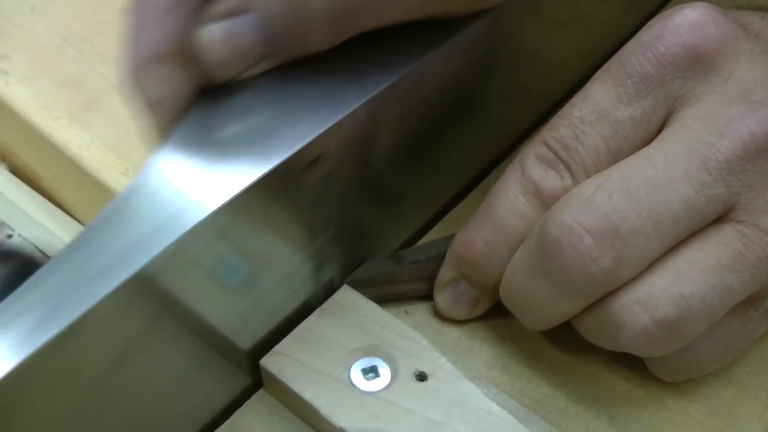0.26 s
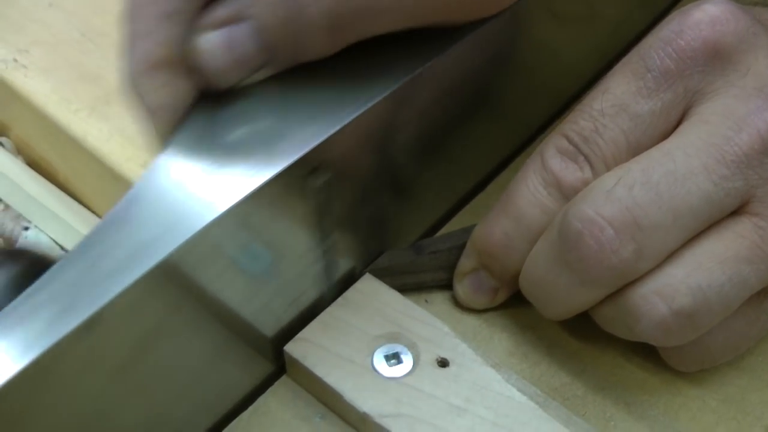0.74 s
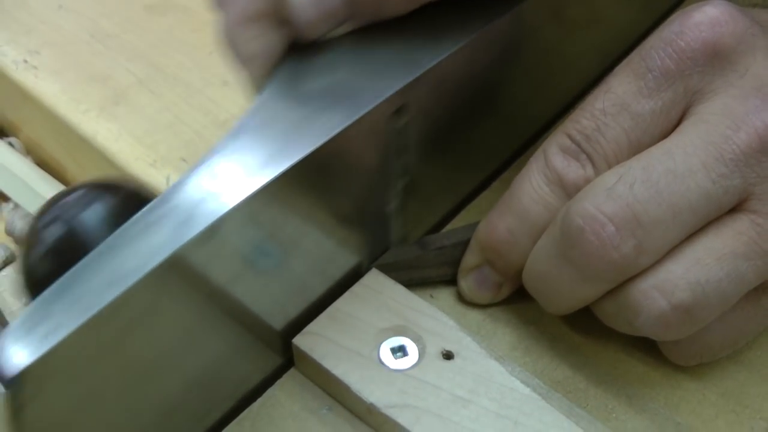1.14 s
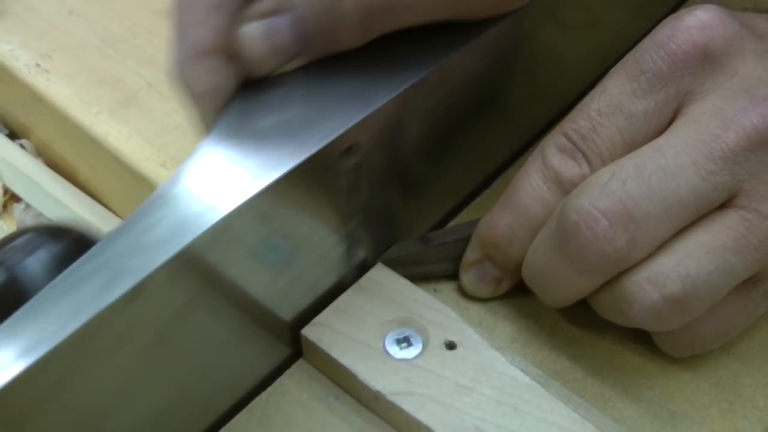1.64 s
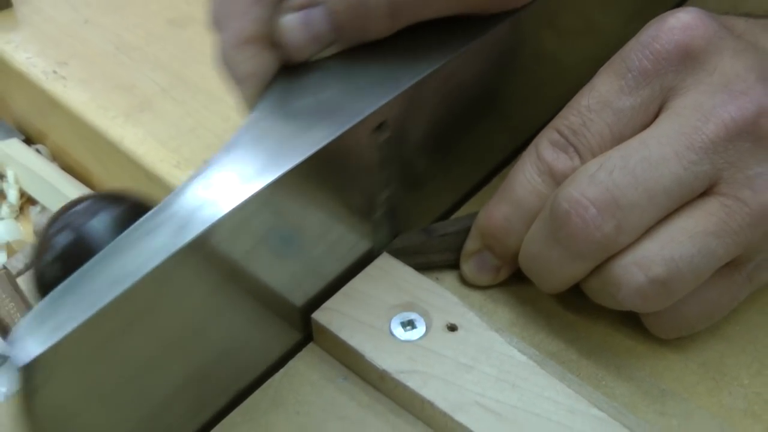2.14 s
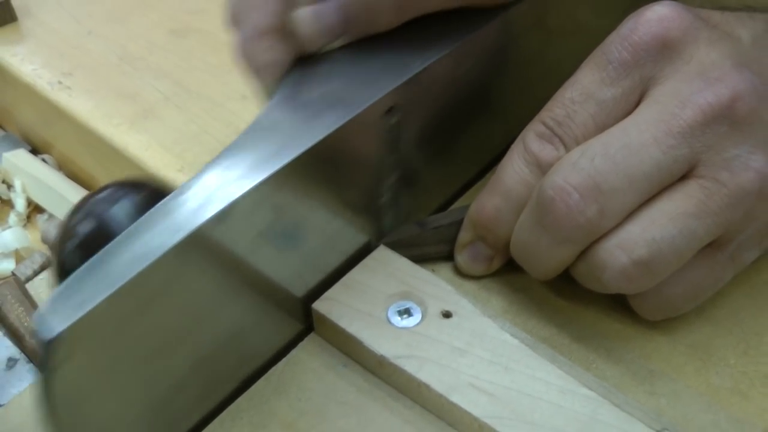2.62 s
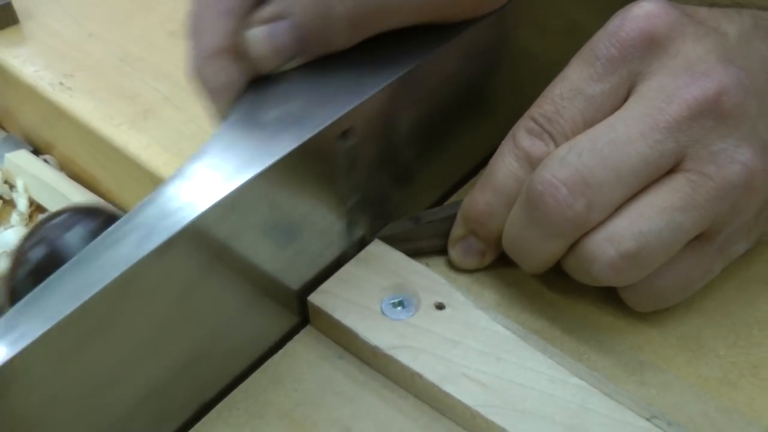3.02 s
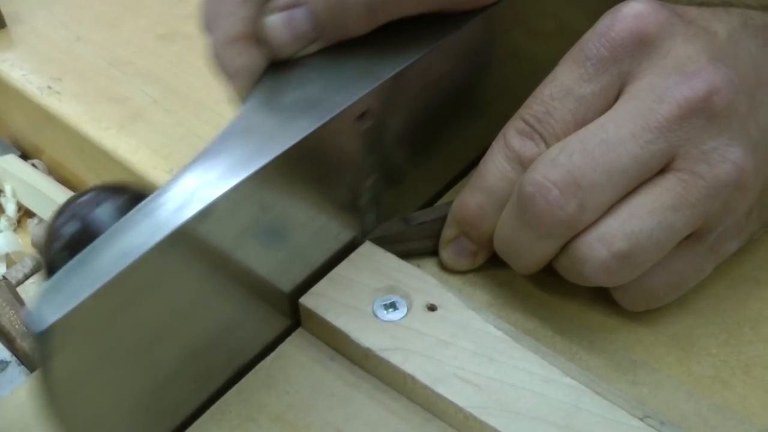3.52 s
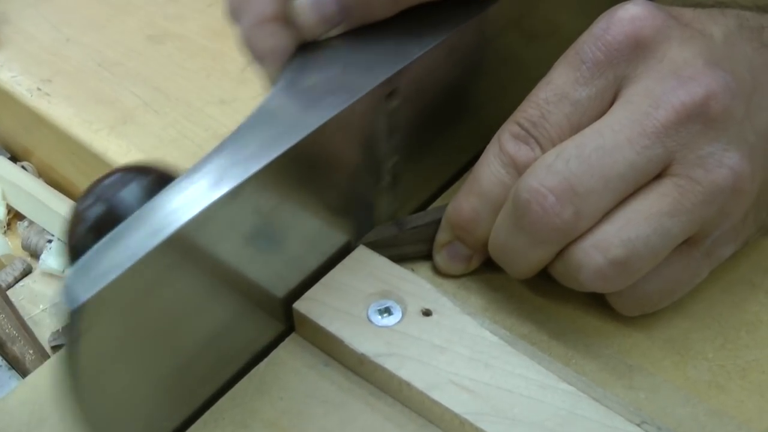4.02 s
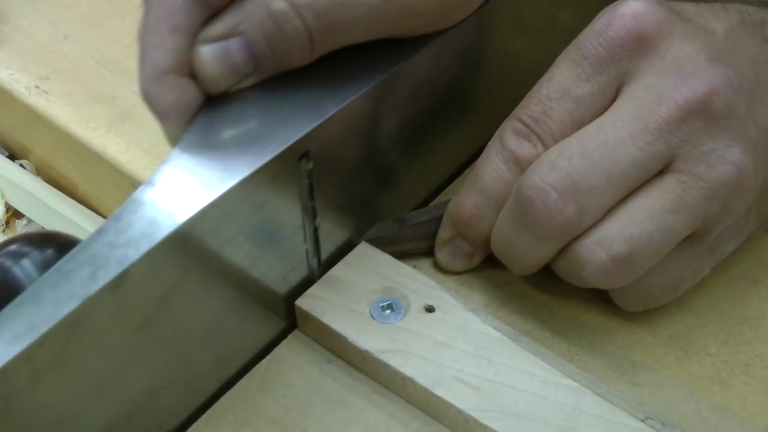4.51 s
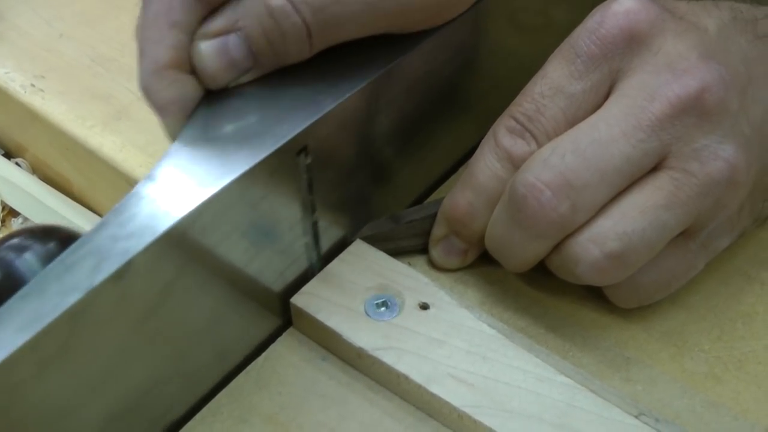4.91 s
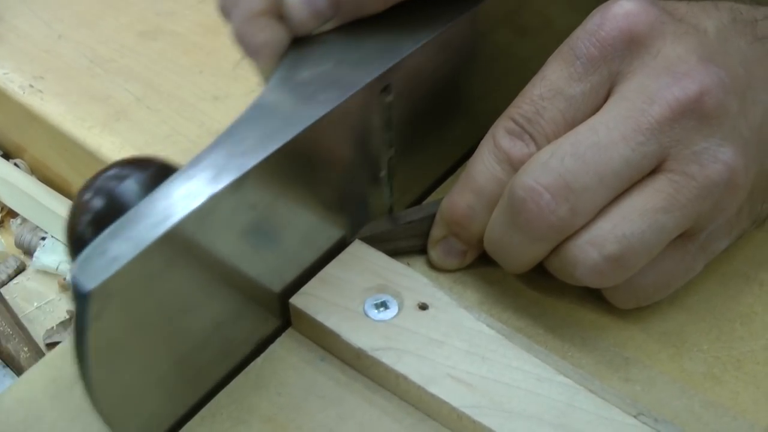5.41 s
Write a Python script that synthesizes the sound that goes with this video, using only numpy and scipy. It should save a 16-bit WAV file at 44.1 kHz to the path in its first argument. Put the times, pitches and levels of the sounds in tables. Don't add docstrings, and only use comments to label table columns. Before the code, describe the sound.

A metal hand plane shuttles rapidly over wood, each push a crisp tearing rasp, each return a softer scrape, with small knocks at every turn.

```python
import sys
import numpy as np
from scipy import signal
from scipy.fft import rfft, irfft
from scipy.io import wavfile
from scipy.ndimage import uniform_filter1d

SR = 44100
rng = np.random.default_rng(int(sys.argv[2]) if len(sys.argv) > 2 else 0)


def voltage_ratio(decibels):
    exponent = np.asarray(decibels, float) / 20
    return 10 ** exponent


def unload_audio(sound):
    columns = np.transpose(np.atleast_2d(sound))
    steps = np.round(np.clip(columns, -1, 1) * 32767)
    wavfile.write(sys.argv[1], SR, steps.astype(np.int16))


N = 249385
T = np.arange(N) / SR
TAPS = 4096


def through(x, response):
    return signal.fftconvolve(x, response)[:N]


def causal(log_gain):
    cepstrum = irfft(log_gain)
    cepstrum[1:TAPS // 2] *= 2
    cepstrum[TAPS // 2 + 1:] = 0
    response = irfft(np.exp(rfft(cepstrum)))
    return response / np.sqrt(np.sum(response ** 2))


def log_colour(points):
    hz, db = np.transpose(points)
    grid = np.linspace(1, SR / 2, TAPS // 2 + 1)
    return np.log(voltage_ratio(np.interp(np.log(grid), np.log(hz), db)))


def body(peaks, source, group=slice(None)):
    grid = np.linspace(1, SR / 2, TAPS // 2 + 1)
    colour = np.exp(2 * log_colour(source))
    power = np.array([voltage_ratio(2 * db) / (1 + ((grid - hz ** 2 / grid) / width) ** 2) ** 2
                      for hz, width, db in peaks])
    part = (power[group].sum(0) + 1e-10) * colour
    share = part.sum() / np.sum(power * colour)
    return causal(np.log(part) / 2) * np.sqrt(share)


def ring(modes):
    t = T[:SR // 3]
    y = sum(gain * np.sin(2 * np.pi * hz * t) * 1000. ** (-t / t60) for hz, gain, t60 in modes)
    return y / np.sqrt(np.mean(y[:SR * 12 // 1000] ** 2))


def blows(times, db):
    x = np.zeros(N)
    place = (np.asarray(times) * SR).astype(int)
    x[np.minimum(place, N - 1)] = voltage_ratio(np.asarray(db))
    return x


def wander(rate_hz):
    hold = int(SR / np.clip(rate_hz, 1, 700))
    levels = rng.standard_normal(N // 60)
    return uniform_filter1d(np.repeat(levels, hold)[:N], hold)


def fibres(spread_db, flicker_db, flicker_hz):
    level_db = spread_db * rng.exponential(size=N) + flicker_db * wander(flicker_hz)
    x = rng.standard_normal(N) * voltage_ratio(level_db)
    return x / np.sqrt(np.mean(x ** 2))


def sound(force, peaks, source, patchy_db, patchy_hz):
    total = np.zeros(N)
    for k in range(3):
        own = rng.choice([-1., 1.], N) * voltage_ratio(patchy_db * wander(patchy_hz))
        total += through(force * own, body(peaks, source, slice(k, None, 3)))
    return total


def chatter(force, hz, ring_s):
    drift_hz, flicker_db = 55, 3
    phase = 2 * np.pi * np.cumsum(hz + drift_hz * wander(120)) / SR
    tail = np.exp(-T[:TAPS] / ring_s)
    strength = through(force * voltage_ratio(flicker_db * wander(160)), tail / tail.sum())
    return strength * np.sin(phase) * np.sqrt(2)


# frequency_hz, width_hz, level_db
BOARD_PEAKS = [(281, 88, -16), (388, 96, -6.5), (435, 66.5, -2.5), (565, 67, 2.5), (616.3, 43, -6),
               (721.5, 66, -10), (820, 75, -12.5)]
IRON_PEAKS = [(1085, 116, -12.5), (1233, 31.4, -6.5), (1408, 91, -4.5), (1733, 650, -6.5), (2020, 156, -11),
              (2085, 440, -17.5)]
EDGE_PEAKS = [(5085, 1000, -10), (5800, 430, -10), (6260, 100, -10), (6660, 310, -7.5), (7265, 500, -5),
              (8000, 400, -7.5), (9330, 170, -2), (9723, 1170, 6), (10890, 133, -36)]
TIP_PEAKS = [(11100, 3800, 1), (11600, 610, -21.5), (12940, 12300, -10), (15800, 470, -22),
             (14800, 590, -34)]
SIDE_PEAKS = [(2670, 1020, -2), (2811, 128, 1.5), (3175, 127, -1.5), (3386, 210, 0), (3865, 370, -6),
              (4717, 110, -5)]
# frequency_hz, build_up_s, ring_s
CHATTER_NOTES = [(1421, 0.016, 0.0017), (2088, 0.0067, 0.0015), (2750, 0.005, 0.0016),
                 (559.3, 0.0013, 0.0058)]
SLOW_BITE = 1.2


def contact(strokes, hums_db, notes, laws, usual_db, tip_curve, lean_curve, times_s, source, grain):
    edge, tip, iron, side, board = np.zeros((5, N))
    sung = np.zeros((len(CHATTER_NOTES), N))
    note_build_s = np.array(CHATTER_NOTES)[:, 1:2]
    quick_s, load_s, off_s = times_s
    for (start, length, early_db, late_db, load_db), hum_db, notes_db in zip(strokes, hums_db, notes):
        since = T - start
        on = (since > 0) * np.clip((length - since) / off_s + .5, 0, 1)
        fresh = np.clip(since, 0, None) + (start < .004)

        def across(early, late):
            return on * voltage_ratio(np.interp(since / length, [.25, .75], [early, late]))

        bite_s = quick_s * voltage_ratio(SLOW_BITE * max(late_db - early_db, 0))
        bite = (1 - np.exp(-fresh / bite_s)) * across(early_db, late_db)
        load = 1 - np.exp(-fresh / (load_s + bite_s))
        edge += bite
        tip += bite * voltage_ratio(np.interp(start, *np.transpose(tip_curve)))
        leans_db = 0, np.interp(start, *np.transpose(lean_curve))
        for part, (early, late, share), lean_db in zip((iron, side), laws, leans_db):
            followed_db = usual_db + share * (load_db - usual_db)
            part += load * across(early + lean_db, late) * voltage_ratio(followed_db)
        board += load * on * voltage_ratio(hum_db - 6.5)
        sung += voltage_ratio(notes_db)[:, None] * on * (1 - np.exp(-fresh / note_build_s))
    total = sum(chatter(force, hz, ring_s) for force, (hz, _, ring_s) in zip(sung, CHATTER_NOTES))
    free_board = BOARD_PEAKS[:3] + BOARD_PEAKS[4:]
    parts = ((edge, EDGE_PEAKS), (tip, TIP_PEAKS), (iron, IRON_PEAKS), (side, SIDE_PEAKS), (board, free_board))
    for force, peaks in parts:
        total += sound(grain * force, peaks, source, patchy_db=0.5, patchy_hz=86.3)
    return total


# start_s, length_s, early_tearing_db, late_tearing_db, iron_load_db
CUTS = [(0, 0.0022, -21, -18, -25.5), (0.3185, 0.02, -22.5, -19.5, -32), (0.651, 0.0244, -21, -21.5, -30),
        (0.9918, 0.026, -20.5, -19, -33), (1.3328, 0.03, -17, -19.5, -30),
        (1.6649, 0.031, -18, -20.5, -32.5), (2.0088, 0.04, -22, -24.5, -30.5),
        (2.3527, 0.049, -24, -25.5, -27.5), (2.7138, 0.037, -21.5, -24.5, -28.5),
        (3.0687, 0.0322, -15.5, -23.5, -28), (3.4149, 0.034, -17.5, -23.5, -25.5),
        (3.7671, 0.036, -18.5, -24.5, -26), (4.1404, 0.025, -14.5, -22, -25.5),
        (4.493, 0.03, -16.5, -22.5, -24), (4.839, 0.038, -18, -26, -24.5), (5.2072, 0.032, -16.5, -22, -29),
        (5.5767, 0.035, -17.5, -22.5, -30)]
# time_s, strength_db, board_hum_db (during the cut before)
EXITS = [(0.008, -22.5, -9.5), (0.3404, -53, -20.5), (0.676, -51, -25.5), (1.0183, -42, -28.5),
         (1.3616, -36, -23.5), (1.6957, -36, -26), (2.0526, -30, -26), (2.405, -20.5, -25),
         (2.753, -28, -24), (3.0994, -15.5, -18.5), (3.4495, -20, -19.5), (3.8045, -23.5, -23),
         (4.1699, -40, -21.5), (4.526, -33, -23), (4.877, -37, -23.5), (5.242, -55, -24.5),
         (5.613, -55, -25)]
# time_s, level_db
SNAPS = [(0.3262, -12), (0.3288, -9.4), (0.66, -11.5), (1.0045, -12.5), (1.3373, -9.3), (1.3459, -13.0),
         (1.6675, -14), (3.0724, -13.0), (3.0842, -11.0), (3.7745, -12.2), (4.1463, -9.1), (4.497, -7.5),
         (4.5048, -13.0), (4.5091, -10.4), (4.84, -12.8), (4.844, -12.1), (4.8483, -12.1), (5.2129, -10.5),
         (5.5805, -12.2), (5.5893, -12.3)]
# start_s, low_note_db, middle_note_db, side_wall_note_db, board_note_db
CUT_NOTES = [(0, -45, -55, -47, -36), (0.32, -37, -54, -31, -27), (0.65, -50, -42, -34, -30.5),
             (0.99, -45, -40, -30, -27), (1.33, -37, -48, -32.5, -26.5), (1.66, -36, -38, -37, -26.5),
             (2.01, -35, -34, -31, -28.5), (2.35, -35, -45, -32.5, -33.5), (2.71, -29.5, -34, -30, -33.5),
             (3.07, -30, -36, -43, -25.5), (3.41, -27.5, -35, -39, -33.5), (3.77, -38, -39, -37, -29),
             (4.14, -62, -31.5, -33, -24), (4.49, -43, -30, -33, -26), (4.84, -56, -28.5, -47, -30),
             (5.21, -33, -25.5, -37, -27), (5.58, -33, -32.5, -39, -24.5)]
# early_over_load_db, late_over_load_db, share_of_load_changes (0-1)
CUT_LOAD = [(-1, 0.62, 0.9), (-2, -0.25, 0.023)]
CUT_USUAL_DB = -29.5
# time_s, tip_over_edge_db
CUT_TIP = [(0.2, -12), (1.3, -26), (2.6, 1), (3.1, -7), (4.0, 2), (5.6, -3)]
# time_s, lean_db
CUT_LEAN = [(0.3, 3.5), (1.4, 4.5), (2.0, 6.5), (2.7, 4.5), (3.2, 6.5), (4.1, 5.5), (4.5, 3.5), (5.6, 2.5)]
# edge_bites_s, load_builds_s, contact_ends_s
CUT_TIMES_S = (0.0009, 0.0025, 0.003)
# frequency_hz, level_db
TEAR_COLOUR = [(200, -3.5), (400, -2), (570, 4), (1000, -5.5), (2200, 2), (4000, 0), (6500, 9), (9000, 2),
               (16000, 25.5)]
RUB_COLOUR = [(200, 10), (500, -4.5), (1500, -1), (4000, 8), (7500, -7.5), (10000, -3.5), (16000, -6)]
# frequency_hz, level_db
SHADE = [(20, 0), (11000, 0), (12200, 2.5), (12700, 1.5), (13000, -6), (13980, -7), (14120, -1),
         (20000, -2)]
# frequency_hz, signed_gain, t60_s
LET_GO = [(322, 0.09, 0.3), (399, 0.42, 0.118), (435, -0.46, 0.165), (486, 0.86, 0.04), (550, -1.0, 0.12),
          (590, 0.58, 0.115), (711, 0.12, 0.114)]
FRONT_KNOCK = [(266, -0.1, 0.272), (290, 0.08, 0.3), (326, 0.32, 0.119), (404, -1.0, 0.041),
               (423, 0.56, 0.052), (531, -0.03, 0.266), (584, 0.13, 0.081), (557, 0.06, 0.057),
               (735, -0.03, 0.24), (1320, 0.07, 0.027), (1399, -0.05, 0.063), (2054, -0.03, 0.067)]
# frequency_hz, width_hz, level_db
TICK_PEAKS = [(702, 116, 6), (1169, 166, 2), (1366, 130, 5.5), (2080, 250, -10)]
THUD_PEAKS = [(216, 210, 2.3), (330, 155, 24)]


def cut():
    exit_s, exit_db, hum_db = np.transpose(EXITS)
    tearing = contact(CUTS, hum_db, np.array(CUT_NOTES)[:, 1:], CUT_LOAD, CUT_USUAL_DB, CUT_TIP, CUT_LEAN,
                      CUT_TIMES_S, TEAR_COLOUR, fibres(1.6, 2.4, 400))
    tearing = through(tearing, causal(log_colour(SHADE))) * voltage_ratio(-1.07)

    snap_s, snap_db = np.transpose(SNAPS)
    chips = through(blows(snap_s - .0014, snap_db - 3), np.hanning(90)) * rng.choice([-1., 1.], N)
    chips = through(chips, body(EDGE_PEAKS[5:] + TIP_PEAKS[:2], RUB_COLOUR))

    thump_db, click_db = exit_db - 18, exit_db - 7
    spring = through(blows(exit_s + 0.00329, exit_db - 5.5), ring(LET_GO))
    spring += through(blows(exit_s, thump_db), ring(FRONT_KNOCK))
    click = through(blows(exit_s, click_db + 19), body(TICK_PEAKS[1:3], RUB_COLOUR))
    thud = through(blows(exit_s, thump_db + 24.0), body(THUD_PEAKS, RUB_COLOUR))
    return tearing + chips + spring + click + thud


# time_s, knock_db, slide_before_stick_db, slide_after_stick_db
FRONT_TURNS = [(0.0719, -37.5, -43.5, -40), (0.4129, -34, -41, -39.5), (0.7553, -35.5, -42, -41),
               (1.0901, -35, -44.5, -40.5), (1.4344, -36, -43, -41.5), (1.7737, -37.5, -44.5, -43.5),
               (2.1229, -38.5, -46, -44), (2.4666, -38, -48, -41.5), (2.8203, -38, -45, -41.5),
               (3.1694, -36, -46, -41.5), (3.5188, -37.5, -44, -42.5), (3.8802, -38.5, -46, -41.5),
               (4.2418, -36.5, -43.5, -39.5), (4.598, -37, -45.5, -43), (4.9545, -38, -46, -46),
               (5.3221, -38, -46, -45.5)]
REAR_TURNS = [(0.2415, -34.5, -41.5, -39.5), (0.5848, -34.5, -40, -37), (0.9268, -34, -39, -36),
              (1.264, -34.5, -42, -37), (1.6006, -34.5, -41, -37.5), (1.948, -34.5, -44, -41.5),
              (2.2939, -36, -44, -45.5), (2.6475, -36.5, -43.5, -42.5), (2.999, -36.5, -40.5, -43.5),
              (3.346, -34.5, -39.5, -40), (3.697, -36, -41, -42.5), (4.0692, -34.5, -38.5, -40.5),
              (4.422, -33.5, -40.5, -40.5), (4.7757, -34.5, -39.5, -42.5), (5.143, -35, -41.5, -42),
              (5.512, -35, -43, -42)]


def turns():
    return np.stack([FRONT_TURNS, REAR_TURNS], axis=1).reshape(-1, 4)


# push_db, pull_db
SEAT_IRON_DB = (-7.5, -5.5)
SEAT_SIDE_DB = (-14, -9.5)
SEAT_TIP_DB = (-6.5, -2.5)


def slide():
    s, _, before_db, after_db = np.transpose(np.vstack([REAR_TURNS[0], turns()]))
    count = len(s)
    stops = np.r_[s[1] - .17, s[1:], s[-1] + .18] + 0.009
    place = np.interp(T, stops, np.arange(len(stops)))
    speed = np.abs(np.sin(np.pi * place))
    marks = np.arange(count)[:, None] + [.3, .7]
    level_db = np.interp(place, marks.ravel(), np.c_[before_db, after_db].ravel())
    grain = fibres(1.9, 1.4, 200) * voltage_ratio(level_db)

    def seat(pair_db):
        return voltage_ratio(np.interp(place, np.arange(count) + .5, np.resize(pair_db, count)))

    def rub(force, peaks, damp=1.7):
        damped = np.array(peaks) * [1, damp, 1]
        return sound(grain * force, damped, RUB_COLOUR, patchy_db=4.0, patchy_hz=13)

    edge = rub(speed ** 1.51, EDGE_PEAKS) * voltage_ratio(-3.5)
    tip = rub(speed ** 1.7 * seat(SEAT_TIP_DB), TIP_PEAKS)
    iron = rub(speed ** 1.64 * seat(SEAT_IRON_DB), IRON_PEAKS)
    side = rub(speed ** 0.81 * seat(SEAT_SIDE_DB), SIDE_PEAKS)
    board = rub(speed ** 0.67, BOARD_PEAKS, damp=1.19) * voltage_ratio(-4.5)
    return edge + tip + iron + side + board


# frequency_hz, signed_gain, t60_s
REAR_KNOCK = [(278, 0.13, 0.102), (314, 0.21, 0.109), (336, -0.9, 0.027), (417, 1.0, 0.025),
              (431, -0.34, 0.066), (539, 0.1, 0.077), (581, -0.17, 0.07), (615, -0.06, 0.133),
              (694, 0.05, 0.113), (1245, 0.03, 0.05), (1340, 0.01, 0.099), (2248, -0.01, 0.025)]
# time_s, level_db
CRUMBS = [(0.2555, -47), (0.6025, -46), (0.9425, -42), (1.282, -44), (1.6175, -47), (4.4348, -47)]


def knocks():
    s, db = turns().T[:2]
    tick = through(blows(s + 0.00116, db + 10.5), body(TICK_PEAKS, RUB_COLOUR))
    crumbs = through(blows(*np.transpose(CRUMBS)), body(EDGE_PEAKS[3:6] + TIP_PEAKS, RUB_COLOUR)) * voltage_ratio(8.0)
    odd = through(blows(s + .002, db - 13) * rng.standard_normal(N), ring(LET_GO))
    front = through(blows(s[::2], db[::2]), ring(FRONT_KNOCK))
    rear = through(blows(s[1::2], db[1::2]), ring(REAR_KNOCK))
    return tick + crumbs + odd + front + rear


# start_s, length_s, early_scrape_db, late_scrape_db, iron_load_db
DRAGS = [(0.158, 0.024, -40, -35.5, -37), (0.5143, 0.028, -37.5, -42, -38.5),
         (0.854, 0.031, -32.5, -42, -38.5), (1.187, 0.027, -32, -34.5, -35),
         (1.527, 0.028, -34, -39.5, -35), (1.8768, 0.029, -34.5, -37.5, -35.5),
         (2.2165, 0.036, -38.5, -35, -38.5), (2.56, 0.032, -40, -40, -40.5),
         (2.909, 0.034, -37, -34.5, -39.5), (3.264, 0.027, -37, -33, -35),
         (3.6073, 0.032, -40, -35.5, -39.5), (3.975, 0.0315, -39, -34, -38.5),
         (4.3426, 0.027, -34, -33.5, -37), (4.6968, 0.033, -36.5, -35.5, -40.5),
         (5.054, 0.037, -40, -37.5, -43.5), (5.4292, 0.035, -38.5, -37.5, -44.5)]
# time_s, level_db
TRIPS = [(0.1805, -18), (0.5352, -21), (0.877, -20), (1.21, -17), (1.5518, -23), (1.9005, -24),
         (2.2488, -12), (2.5917, -27), (2.9394, -24), (3.2838, -19), (3.6385, -22), (4.0012, -22),
         (4.365, -18), (4.7241, -23), (5.091, -24), (5.4605, -26)]
# low_note_db, middle_note_db, side_wall_note_db, board_note_db
DRAG_NOTES_DB = (-9.5, -9.5, -13, -3.5)
# early_over_load_db, late_over_load_db, share_of_load_changes (0-1)
DRAG_LOAD = [(-3.5, -1.3, 0.75), (2.5, -1, 0.44)]
DRAG_USUAL_DB = -44.5
# time_s, tip_over_edge_db
DRAG_TIP = [(0.2, -18), (2.5, -14), (5.5, -10)]
# time_s, lean_db
DRAG_LEAN = [(0.2, -4), (1.4, -0.5), (2.8, -7), (5.5, -2.5)]
# edge_bites_s, load_builds_s, contact_ends_s
DRAG_TIMES_S = (0.0018, 0.0022, 0.002)
# frequency_hz, level_db
SCRAPE_COLOUR = [(200, -8), (450, -2.5), (1000, 0), (4000, 4), (4700, 2.5), (5400, 7), (7500, -9),
                 (16000, 4.5)]


def drag():
    load_db = np.array(DRAGS)[:, 4]
    notes = load_db[:, None] + DRAG_NOTES_DB
    scrape = contact(DRAGS, load_db, notes, DRAG_LOAD, DRAG_USUAL_DB, DRAG_TIP, DRAG_LEAN,
                     DRAG_TIMES_S, SCRAPE_COLOUR, fibres(2.17, 0.51, 370))
    plane = IRON_PEAKS + SIDE_PEAKS[:5] + EDGE_PEAKS[:8] + TIP_PEAKS[:1]
    trips = through(blows(*np.transpose(TRIPS)), body(plane, RUB_COLOUR))
    return scrape + voltage_ratio(2.5) * trips


def reverberation(near):
    t60_s, echo_db = 0.23, -23
    t = T[:SR // 2]
    echo = rng.standard_normal(len(t)) * 1000. ** (-t / t60_s) * (t > .006)
    echo = signal.lfilter([1], [1, -.7], echo)
    echo *= voltage_ratio(echo_db) / np.sqrt(np.sum(echo ** 2))
    return through(near, echo)


# frequency_hz, density_db (per Hz)
SHOP_AIR = [(18, -62), (30, -28), (179, 4.5), (328, -74), (486, -11), (569, -6), (937, -27), (1390, -8.5),
            (7670, -24), (9970, -26), (16000, -18)]


def air():
    return through(rng.standard_normal(N), causal(log_colour(SHOP_AIR))) * voltage_ratio(-59.5)


def scene():
    near = cut() + slide() + knocks() + drag()
    return (near + reverberation(near) + air())[None]


def roll_off(x):
    return signal.sosfilt(signal.butter(12, 16990, fs=SR, output="sos"), x)


# frequency_hz, level_db
MIC = [(20, -35), (120, -21), (215, -0.5), (830, -1), (905, -1.5), (990, 2), (1510, -2), (1600, -9),
       (1690, 0.5), (20000, 0.5)]
# frequency_hz, level_db
TOP_TILT = [(20, 0), (12400, 0), (13200, -2.5), (20000, -3)]
# frequency_hz, level_db
RUMBLE = [(20, 2), (60, -3), (150, 8), (400, -41), (20000, -45)]


def record(dry):
    rumble = through(rng.standard_normal(N), causal(log_colour(RUMBLE))) * voltage_ratio(-77.5)
    heard = through(dry[0], causal(log_colour(MIC) + log_colour(TOP_TILT)))[None]
    heard = np.tanh(1.15 * heard) / 1.15
    heard = signal.sosfilt(signal.butter(2, 110, "high", fs=SR, output="sos"), heard) + rumble
    heard = signal.sosfilt(signal.ellip(12, .3, 55, 15720, fs=SR, output="sos"), heard)
    return roll_off(heard)


dry = scene()
out = record(dry)
unload_audio(out)
```